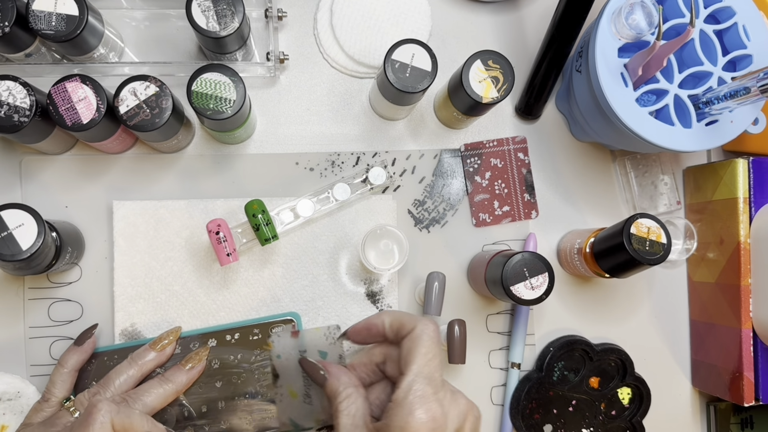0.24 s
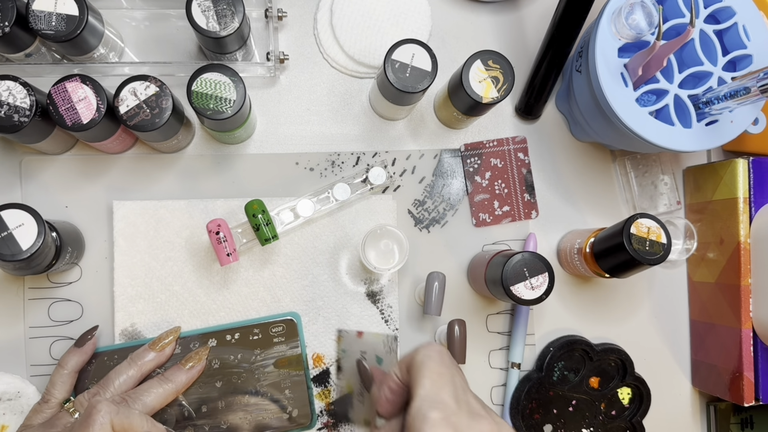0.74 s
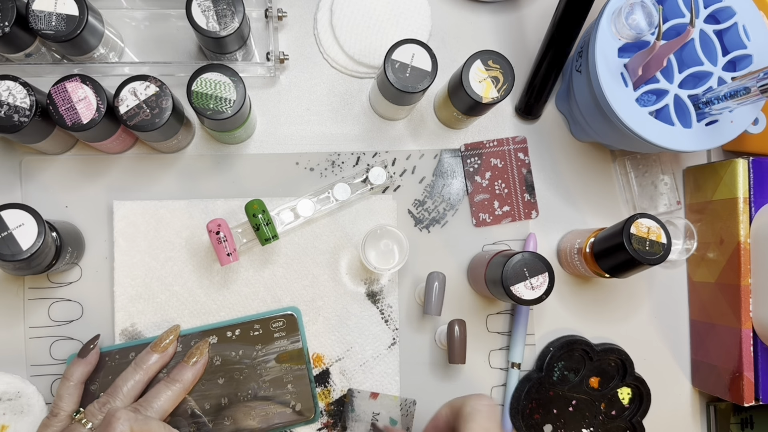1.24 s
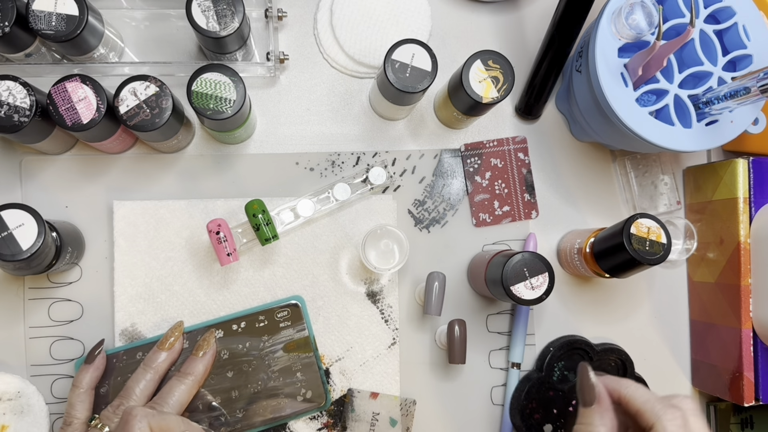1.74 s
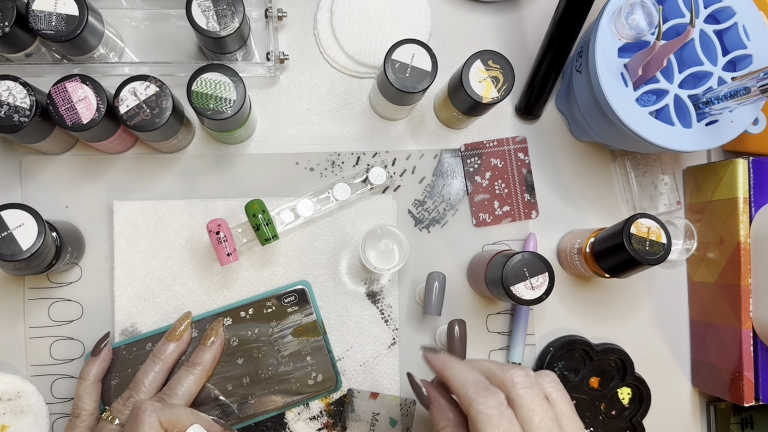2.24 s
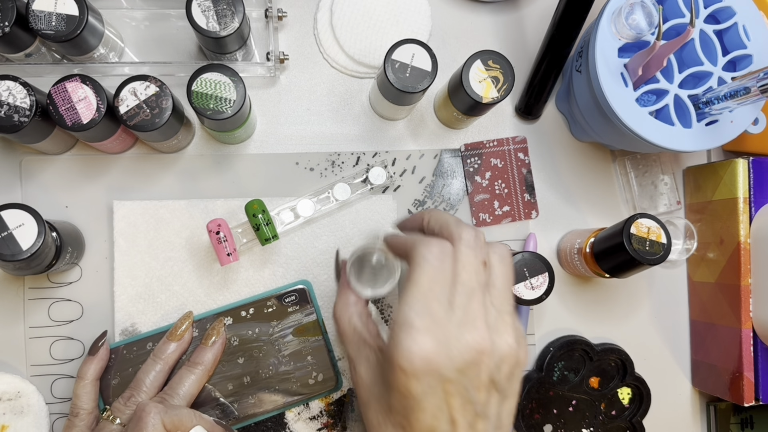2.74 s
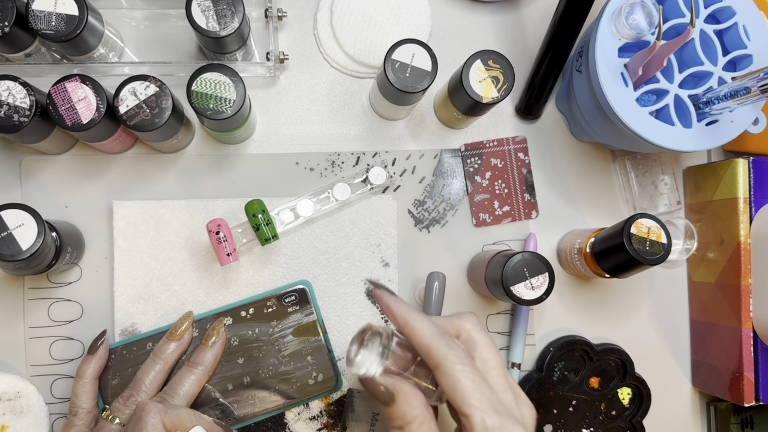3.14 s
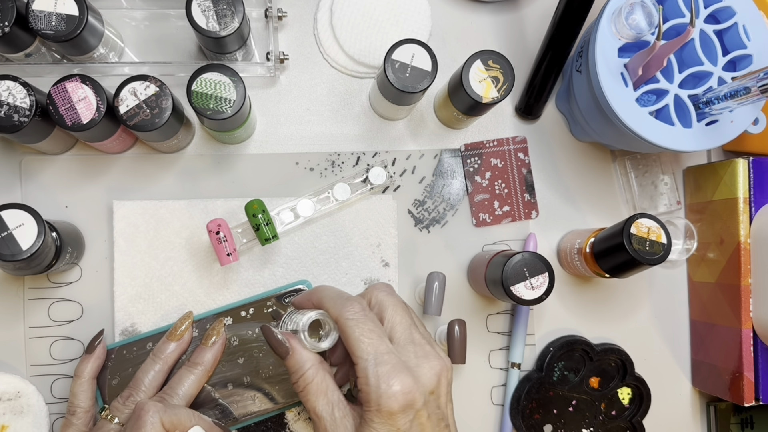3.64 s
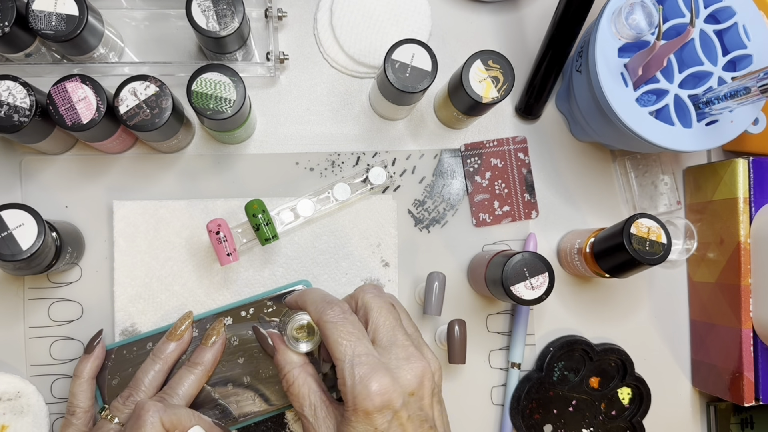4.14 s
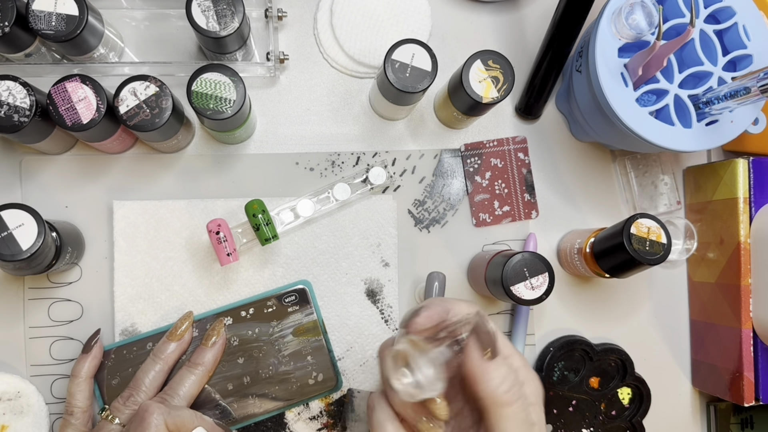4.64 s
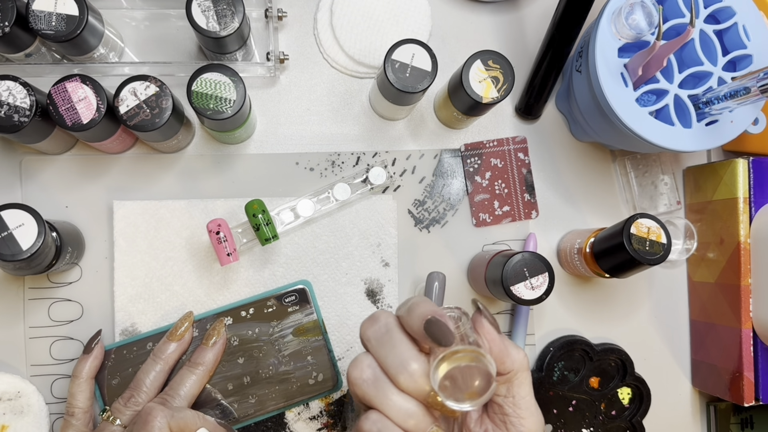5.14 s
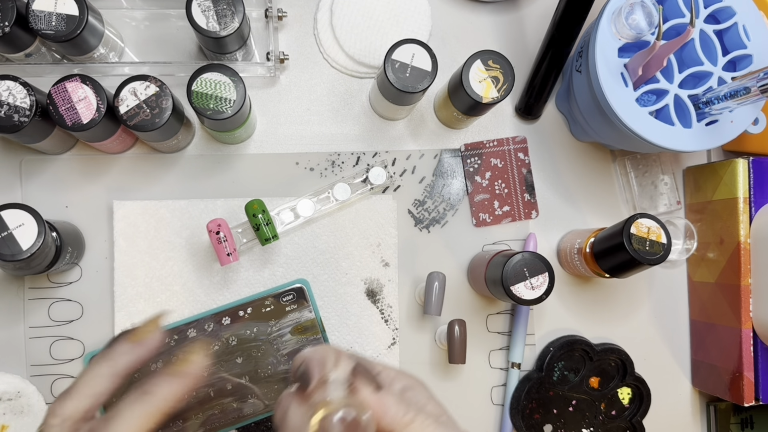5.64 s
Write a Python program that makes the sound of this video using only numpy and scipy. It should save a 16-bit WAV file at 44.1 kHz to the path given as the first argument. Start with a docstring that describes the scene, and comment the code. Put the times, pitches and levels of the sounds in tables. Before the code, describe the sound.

At a desk in a small quiet room with a low hum, a stiff plastic card lands on a steel plate with quick bounces, scrapes, stutters and snaps off the edge. Fingers rub plastic, the card is dropped with a click and thud, then after soft rubbing a stamper bounces on the plate and rolls with gripping creaks. Close stereo microphone, slightly left.

```python
"""A low hum and soft air in a small room, and fingers rubbing plastic; then a card lands on a steel plate.
Nail stamping at a desk, close and slightly left of a two-port microphone. The card scrapes, stutters, snaps
off the plate's edge, rattles and is dropped on the desk; a stamper bounces on the plate and is rolled over it.
Blows ring banks of resonances, friction is random grains through resonances or spectra, and the room is
shaped noise and sines, with a scattered echo and a diffuse tail around the near sounds."""
import sys
import numpy as np
from scipy import signal
from scipy.fft import rfft, irfft, next_fast_len
from scipy.io import wavfile

SR = 44100
rng = np.random.default_rng(int(sys.argv[2]) if len(sys.argv) > 2 else 0)


def to_wav(sig):
    """Store sig (one row per channel, or 1-D mono) as 16-bit WAV at the path in sys.argv[1].

    Samples outside -1..1 are clipped; the rate is SR.
    """
    pcm = np.clip(np.atleast_2d(sig), -1, 1) * 32767
    pcm = np.round(pcm).astype(np.int16)
    wavfile.write(sys.argv[1], SR, pcm.T)  # frames by channels


N = 260234
TIME = np.arange(N) / SR


def from_db(db):
    """Decibels to gain."""
    return 10 ** (np.asarray(db) / 20)


def rms_one(x):
    """Scale to unit rms."""
    return x / np.sqrt(np.mean(x ** 2) + 1e-20)


def at_hz(points, hz):
    """Read a table on a log-frequency axis."""
    knots, values = np.transpose(points)
    return np.interp(np.log(np.maximum(hz, 1)), np.log(knots), values)


def coloured(x, spectrum):
    """Give a signal a spectrum; rms 1."""
    size = next_fast_len(N)
    hz = np.fft.rfftfreq(size, 1 / SR)
    shaped = rfft(x, size) * from_db(at_hz(spectrum, hz))
    return rms_one(irfft(shaped, size)[..., :N])


def filtered(x, order, hz, kind):
    """Butterworth filter."""
    return signal.sosfilt(signal.butter(order, hz, kind, fs=SR, output="sos"), x)


def stereo_noise(side_db):
    """White noise shared by both sides, plus a part of opposite sign in each."""
    mid, side = rng.standard_normal((2, N))
    return mid + from_db(side_db) * side * [[1], [-1]]


def grains(per_s, spread_db):
    """Tiny random catches of one surface on another; rms 1."""
    loudness_db = spread_db * np.minimum(rng.exponential(1, N), 4)
    sizes = from_db(loudness_db) * rng.choice([-1, 1], N)
    caught = rng.random(N) < per_s / SR
    return rms_one(sizes * caught)


def clicks(times, db):
    """One impulse for each contact."""
    out = np.zeros(N)
    out[np.round(times * SR).astype(int)] = from_db(db)
    return out


def resonate(x, hz, width):
    """A resonance with gain 1 on top."""
    r = np.exp(-np.pi * width / SR)
    zeros = np.array([1, 0, -1]) * (1 - r * r) / 2
    poles = [1, -2 * r * np.cos(2 * np.pi * hz / SR), r * r]
    return signal.lfilter(zeros, poles, x + 1e-18)


def mode(x, hz, width):
    """A body's mode radiates only near its own pitch, so its skirts are steep."""
    return resonate(resonate(x, hz, width), hz, 0.46 * hz)


def struck(modes, times, db, low_db, high_db, spread_s):
    """Blows ring a body; bending waves carry the high modes out first and the low ones a little later."""
    out = np.zeros(N)
    height = sum(from_db(level) * 2 * np.pi * width / SR for hz, width, level in modes)
    for hz, width, level in modes:
        low_part = low_db * np.interp(hz, (1300, 2000), [1, 0])
        high_part = high_db * np.interp(hz, (3000, 5500), [0, 1])
        travel = spread_s * np.sqrt(modes[0][0] / hz)
        blows = clicks(times + travel, db + level + low_part + high_part)
        out += mode(blows, hz, width)
    return 2 * out / height


def crack(times, db, hz, width):
    """The contact itself: a sharp snap of one or two cycles."""
    snap = filtered(resonate(clicks(times, db), hz, width), 2, 1500, "high")
    return snap * SR / (np.pi * width)


def gate(start, end, attack_s, release_s):
    """One while two surfaces touch, with short ramps."""
    return np.clip((TIME - start) / attack_s, 0, 1) * np.clip((end - TIME) / release_s, 0, 1)


# a stroke's rise from its ends to its peak [dB]; its fade in and out [s]
SWELL_DB, SWELL_EDGE_S = 10, .012


def swells(strokes):
    """Gain of hand strokes that speed up to a peak and slow down again."""
    total = 0
    for start, peak, end, db in strokes:
        from_peak = np.interp(TIME, [start, peak, end], [1, 0, 1])
        gain = from_db(db - SWELL_DB * from_peak ** 1.4)
        total = total + gain * gate(start, end, SWELL_EDGE_S, SWELL_EDGE_S)
    return total


def waver(per_s, depth_db):
    """A gain that wanders at random."""
    return from_db(depth_db * np.interp(TIME * per_s, np.arange(2000), rng.standard_normal(2000)))


# a dropped thing bounces ever faster: the k-th gap is the first gap / k ** BOUNCE_HASTE
BOUNCE_HASTE, BOUNCE_SCATTER_DB = .57, 1.23
BOUNCE_DULLING_DB = 0.73  # high modes lost on each bounce


def bounces(start, db, first_gap_s, loss_db, low_db, high_db, count=10):
    """Contacts of one landing, sooner, fainter and duller: times, strength, low and high modes."""
    k = np.arange(count)
    times = start + first_gap_s * np.append(0, np.cumsum(k[1:] ** -BOUNCE_HASTE))
    scatter_db = BOUNCE_SCATTER_DB * rng.standard_normal((2, count)) * (k > 0)
    strength_db = db - loss_db * k + scatter_db[0]
    return times, strength_db, low_db + scatter_db[1], high_db - BOUNCE_DULLING_DB * k


# low rumble of the room: (frequency [Hz], relative density [dB])
RUMBLE_SPECTRUM = [(20, -31), (30, -15), (38, -4.5), (55, -0.5), (70, -1), (85, -3), (125, -4), (170, -12),
                   (230, -18.5), (320, -23), (400, -28), (700, -63)]
# air of the room: (frequency [Hz], relative density [dB])
AIR_SPECTRUM = [(180, -30.5), (300, -6), (332, -3), (379, -17), (452, -3), (494, -6.5), (653, -6.5),
                (790, -13), (863, -8.5), (1040, -16.5), (1880, -15.5), (3800, -31), (4800, -41),
                (7350, -32.5), (10000, -40), (13000, -69), (22000, -120)]
# steady hum lines: (frequency [Hz], rms level [dB])
HUM_LINES = [(57.2, -59), (120, -69.5), (238.5, -72), (266, -78.5)]


def background():
    """Rumble, air, a faint hiss and the lines of a low hum."""
    rumble = from_db(-55.5) * coloured(stereo_noise(side_db=-39), RUMBLE_SPECTRUM)
    air = from_db(-65.5) * coloured(stereo_noise(side_db=-11.5), AIR_SPECTRUM)
    diffuse_spectrum = [(30, -24.5), (70, -8.5), (150, -6.5), (500, -5), (900, -3.5),
                        (1600, -21.5), (5000, -42.5)]
    diffuse = from_db(-68) * coloured(rng.standard_normal(N), diffuse_spectrum)
    hiss_spectrum = [(5000, -9), (10000, -4), (15000, 3.5), (18000, -5.5)]
    hiss = from_db(-83) * coloured(rng.standard_normal(N), hiss_spectrum)
    hum = 0
    for hz, db in HUM_LINES:
        hum = hum + from_db(db) * np.sqrt(2) * np.sin(2 * np.pi * (hz * TIME + rng.random()))
    return rumble + air + hiss + hum + diffuse * [[1], [-1]]  # the diffuse part is opposite in the two sides


# level of the room's tail: (frequency [Hz], gain [dB])
TAIL_GAIN = [(150, 5.5), (500, 0), (1200, -10.5), (2700, -13.5), (5000, -11), (9000, -16)]
# how long the room rings: (frequency [Hz], time to fall 60 dB [s])
TAIL_T60 = [(150, .36), (600, .26), (2500, 0.39), (6000, 0.31), (10000, 0.34)]


def room(x, side_db):
    """A diffuse tail that builds up quickly and dies band by band."""
    t, tail = TIME[:SR // 2], 0
    edges = np.geomspace(70, 17000, 12)
    for low, high in zip(edges, edges[1:]):
        hz = np.sqrt(low * high)
        fade = from_db(-60 * t / at_hz(TAIL_T60, hz)) * np.clip((t - .003) / 0.0027, 0, 1)
        # long waves reach both sides alike
        width_db = side_db + at_hz([(100, -22.5), (500, 0), (2500, 0), (9000, -9)], hz)
        noise = filtered(rms_one(stereo_noise(width_db)[:, :len(t)]), 2, [low, high], "band")
        tail = tail + from_db(at_hz(TAIL_GAIN, hz)) * noise * fade / np.sqrt(np.sum(fade ** 2))
    return signal.fftconvolve(x[None], tail, axes=1)[:, :N]


def desk_echoes(x, echo_db, fade_s):
    """Bottles and desk top scatter the sound within milliseconds, differently to each side."""
    t = TIME[:SR // 25]
    scatter = rng.standard_normal((2, len(t))) * np.exp(-t / fade_s) * (t > .0012)
    scatter = scatter + .3 * scatter[::-1]  # each side hears some of the other
    scatter /= np.sqrt(np.sum(scatter ** 2, axis=1, keepdims=True))
    return from_db(echo_db) * signal.fftconvolve(x[None], scatter, axes=1)[:, :N]


# skin rubbing on plastic: (start [s], peak [s], end [s], level before a shared 1.5 dB lift [dB])
RUB_STROKES = [(-.06, .06, 0.19, -63), (.95, 1.05, 1.22, -55.5), (1.46, 1.55, 1.74, -60.5),
               (1.785, 1.83, 2.07, -57.5), (2.39, 2.45, 2.56, -75.5), (2.68, 2.75, 2.82, -67),
               (2.97, 3.03, 3.23, -71), (4.32, 4.365, 4.44, -66.5), (5.44, 5.458, 5.47, -64),
               (5.54, 5.62, 5.7, -70)]
# hiss of skin: (frequency [Hz], relative density [dB])
SKIN_SPECTRUM = [(900, -12.5), (1800, -3.5), (3000, -.5), (4000, -6.5), (4900, -13), (5700, 1), (7500, 0.5),
                 (9500, -0.5), (16000, -1)]


def finger_rubs():
    """Fingertips slide over card and tools with a smooth, high hiss."""
    hiss = coloured(grains(per_s=9000, spread_db=3.0), SKIN_SPECTRUM)
    return from_db(1.5) * swells(RUB_STROKES) * hiss


# light ticks of fingernails, plastic and one duller tap on the plate:
# (time [s], strength before a shared 6 dB lift [dB], high modes [dB])
TICKS = [(0.234, -37, 7.5), (0.4727, -24, -4.5), (1.1058, -32, -4), (1.1153, -20, 0.5), (1.1243, -21, -1.5),
         (1.1574, -27, -15), (1.168, -33, -4), (1.1930, -36, 8), (1.9350, -43.5, 8), (2.7090, -28.5, -3),
         (4.364, -45, 1), (4.4015, -36, -8)]
# modes that the light ticks ring: (frequency [Hz], width [Hz], relative level [dB])
TICK_MODES = [(1380, 450, -8), (2000, 410, -6.5), (2500, 250, -4), (3400, 150, -10), (6000, 590, -27),
              (7470, 700, -3.5), (9100, 900, -6), (10150, 1200, -5), (14480, 2300, -10)]


def light_ticks():
    """Small contacts, some bright and some duller, ring one shared set of modes."""
    times, db, high_db = np.transpose(TICKS)
    return struck(TICK_MODES, times, db + 6, 0, high_db, spread_s=.0002)


# the card slides on the paper mat: (start [s], peak [s], end [s], level [dB])
MAT_STROKES = [(.96, 1.09, 1.21, -59)]
# modes of the plastic card: (frequency [Hz], width [Hz], relative level [dB])
CARD_MODES = [(557, 62, -10), (746.7, 260, -1), (1096, 160, 2), (1260, 130, -11), (1900, 180, -8.5),
              (2390, 340, -6.5), (2687, 280, 1.5), (2906, 220, 3.5), (3240, 300, -1), (3980, 450, -7),
              (5640, 550, -7.5), (6280, 900, -7.5), (7050, 500, -12), (8000, 850, -8.5), (9203, 280, -5.5)]


def card_rustle():
    """The card slides over the paper mat before it is let go, faintly ringing its own modes."""
    friction = grains(per_s=2700, spread_db=2.5)
    ring = sum(from_db(db) * resonate(friction, hz, width) for hz, width, db in CARD_MODES)
    return swells(MAT_STROKES) * rms_one(filtered(ring, 2, 2400, "high"))


# the card snaps off the plate and knocks on the desk:
# (time [s], strength [dB], low modes [dB], high modes [dB], desk thud [dB], crack [dB])
KNOCKS = [(0.715, 0, -24, 1.5, -75, -7), (0.7243, .5, 4, 1.5, -43, -6), (1.212, -9, -14, 7, -62, -24.5),
          (1.2148, 0.5, -3, 0, -23, -2)]
# modes of the desk: (frequency [Hz], width [Hz], relative level [dB])
DESK_MODES = [(97.7, 16, -1.5), (127.1, 24, 3), (193, 26, 0), (220, 30, -1.5), (305, 40, -1.5),
              (491.4, 55, -1), (538, 55, -2), (630, 70, 1)]


def card_knocks():
    """The stiff card cracks, and the desk under it thuds."""
    times, db, low_db, high_db, thud_db, crack_db = np.transpose(KNOCKS)
    card = struck(CARD_MODES, times, db, low_db, high_db, spread_s=0.00026)
    snap = crack(times + .0001, crack_db, hz=3217, width=3800)
    thud = struck(DESK_MODES, times, thud_db, 0, 0, spread_s=0.0036)
    return card + snap + thud


# modes of the steel plate: (frequency [Hz], width [Hz], relative level [dB])
PLATE_MODES = [(201, 40, -14), (310, 60, -8), (486.4, 100, -7), (710, 90, -13), (856, 230, -9.5),
               (1183, 170, -4.5), (1404, 74, -6.5), (1720, 170, -7), (1933, 90, 1), (2308, 170, 4.5),
               (2660, 150, -4.5), (2802, 140, 2.5), (3100, 63, -7.5), (3485, 220, -12), (4190, 330, -7),
               (5500, 420, -12.5), (6200, 450, -11.5), (8100, 350, -18), (8590, 350, -19),
               (9266, 660, -19.5)]


def card_taps(times, db, low_db, high_db):
    """Taps of the card ring the plate's modes, each with a short crack."""
    ring = struck(PLATE_MODES, times, db, low_db, high_db, spread_s=.0008)
    return ring + crack(times, db + high_db - 19.5, hz=4000, width=5700)


# the card lands on the plate, and later rattles after it snaps off the edge:
# (time [s], strength [dB], first gap [s], loss per bounce [dB], low modes [dB], high modes [dB])
RATTLES = [(0.1191, -12, .0148, 2.5, 2.5, 3.5), (0.7246, -23.5, .016, 0.66, -8, 6)]


def card_rattles():
    """The card lands on the plate, and later rattles after it snaps off the edge: two runs of bounces."""
    return card_taps(*np.hstack([bounces(*rattle) for rattle in RATTLES]))


# near the edge the card sticks and slips, harder each time apart from a random scatter
STUTTER_START_S, SLIP_GAP_S, SLIP_JITTER_S = .6262, .0097, .0008
SLIP_DB, SLIP_GROWTH_DB, SLIP_SCATTER_DB = -29, 1.0, 1.25


def card_stutter(count=9):
    """The card sticks and slips, growing harder, until it leaves the plate."""
    k = np.arange(count)
    early, stronger = rng.standard_normal((2, count))
    times = STUTTER_START_S + SLIP_GAP_S * k + SLIP_JITTER_S * early
    strength_db = SLIP_DB + SLIP_GROWTH_DB * k + SLIP_SCATTER_DB * stronger
    return card_taps(times, strength_db, low_db=0, high_db=3)


def sliding(gain, per_s, spread_db, soft_hz, rasp_db):
    """Friction grains ring the plate and rasp at the contact; a softer contact leaves out the top."""
    force = filtered(grains(per_s, spread_db), 4, min(soft_hz, 15000), "low")
    ring = sum(from_db(db) * resonate(force, hz, width) for hz, width, db in PLATE_MODES)
    rasp = from_db(rasp_db) * resonate(force, hz=1200, width=2800)
    return gain * rms_one(ring + rasp)


# the card's edge is drawn over the plate:
# (start [s], end [s], level at start [dB], swell [dB per s], hiss relative to the level [dB])
EDGE_SCRAPES = [(.15, .51, -50, -5, -17), (.563, .715, -52.5, 48, -7.5)]
# hiss of scraped steel: (frequency [Hz], relative density [dB])
SCRAPE_SPECTRUM = [(3000, -31.5), (4800, -4.5), (5700, 0.5), (6500, -1), (7300, -1), (8500, -0.5),
                   (10000, -8.5), (16000, -7.5)]
SCRAPE_ATTACK_S, SCRAPE_RELEASE_S = 0.023, .045


def card_scrape():
    """The card's edge drags over the etched steel with a fine hiss."""
    drag, fine = 0, 0
    for start, end, db, swell_db_per_s, hiss_db in EDGE_SCRAPES:
        level = from_db(db + swell_db_per_s * (np.clip(TIME, start, end) - start))
        touch = gate(start, end + SCRAPE_RELEASE_S / 2, SCRAPE_ATTACK_S, SCRAPE_RELEASE_S)
        drag = drag + level * touch
        fine = fine + level * touch * from_db(hiss_db)
    body = sliding(drag, per_s=2200, spread_db=2.5, soft_hz=3330, rasp_db=-15)
    hiss = fine * coloured(grains(per_s=9000, spread_db=2.5), SCRAPE_SPECTRUM)
    return waver(per_s=45, depth_db=1.8) * (body + hiss)


# the rolling silicone grips and lets go at a nearly even pace, counted from GRIP_AT_S both ways
GRIP_AT_S, GRIP_GAP_S, GRIP_JITTER_S, GRIP_RISE_S, GRIP_SCATTER_DB = 3.456, .027, 0.0034, 0.0031, 1.8


def grips(count=32):
    """Gain of the short swells in which the silicone lets go of the steel: a quick rise, a slower fall."""
    early, stronger = rng.standard_normal((2, count))
    steps = np.arange(count) - count // 4
    times = GRIP_AT_S + GRIP_GAP_S * steps + GRIP_JITTER_S * early
    age = TIME[:SR // 20] / GRIP_RISE_S
    swell = age ** 2 * np.exp(-age)
    return signal.fftconvolve(clicks(times, GRIP_SCATTER_DB * stronger), swell / swell.max())[:N]


# how hard the stamper is rolled over the plate: (time [s], level [dB])
ROLL_LEVEL = [(3.37, -57), (3.397, -48.5), (3.46, -45), (3.58, -44.5), (3.71, -46), (3.8, -57.5),
              (3.95, -69), (4.08, -80)]
# the stamper creaks as it is tipped and lifted:
# (start [s], peak [s], end [s], level before a shared 3.5 dB cut [dB])
CREAK_STROKES = [(4.42, 4.46, 4.505, -55.5), (4.532, 4.543, 4.556, -51.5)]
HISS_FADE_DB_PER_S = 23  # the roll loses its hiss as it goes on


def stamper_roll():
    """Soft silicone rolls over the plate: pressed hard it grips in bright swells, then turns smooth and dull."""
    times, db = np.transpose(ROLL_LEVEL)
    touch = gate(times[0], times[-1], SWELL_EDGE_S, SWELL_EDGE_S)
    rolling = from_db(np.interp(TIME, times, db)) * touch
    effort = rolling / rolling.max()
    grip_share = 0.65 * effort ** 0.48
    slipping = rolling * (grip_share * grips() + (1 - grip_share) * from_db(-6.0))

    # the dull part levels off however hard the roll is pressed
    dull_gain = from_db(-1) * rolling / (1 + rolling / from_db(-58))
    dull = sliding(dull_gain, per_s=1200, spread_db=3.0, soft_hz=1700, rasp_db=-13)

    creak_gain = from_db(.5) * slipping * effort ** .15 + from_db(-3.5) * swells(CREAK_STROKES)
    creak = sliding(creak_gain, per_s=2500, spread_db=2.0, soft_hz=3410, rasp_db=-23)

    fade = from_db(-HISS_FADE_DB_PER_S * np.maximum(TIME - GRIP_AT_S, 0))
    hiss_gain = from_db(-9.5) * slipping * effort ** 0.9 * fade
    hiss = hiss_gain * coloured(grains(per_s=5000, spread_db=3.0), SCRAPE_SPECTRUM)
    return dull + creak + hiss


# the stamper lands on the plate:
# (time [s], strength [dB], first gap [s], loss per bounce [dB], low modes [dB], high modes [dB])
STAMPER_DROP = (3.1744, -14, .018, 1.52, 3.5, -2.5)


def stamper():
    """The stamper bounces, then rolls; its hollow barrel adds a ring and deadens the plate's middle."""
    landing = struck(PLATE_MODES, *bounces(*STAMPER_DROP), spread_s=0.00061)
    contact = landing + stamper_roll()
    barrel = from_db(-7.5) * resonate(contact, hz=2922, width=240)
    deadened = from_db(-20) * resonate(contact, hz=2060, width=580)
    return from_db(0.5) * (contact + barrel - deadened)


def scene():
    """Everything on the desk, a little to the left, with its echoes, over the background."""
    card = card_rattles() + card_stutter() + card_knocks() + card_scrape() + card_rustle()
    near = finger_rubs() + light_ticks() + card + stamper()
    direct = near * from_db(0.91 * np.array([[.5], [-.5]]))  # left is 0.91 dB louder
    echoes = desk_echoes(near, echo_db=-8, fade_s=0.012)
    return background() + room(near, side_db=-3.5) + echoes + direct


# the two ports fall out of step in the treble: (frequency [Hz], phase by which left leads [radians])
PORT_LEAD = [(250, 0), (800, .4), (1500, 0), (4000, -.35), (4900, -.8), (5500, -.2), (7000, -.45),
             (9700, -1.8), (11000, -3.0), (14000, -3.15), (15500, -3.9)]
# the microphone's colour: (frequency [Hz], gain [dB])
MIC_GAIN = [(6000, 0), (7200, 0), (9200, 0), (10200, -2), (11200, -10), (13000, -11), (15300, -4),
            (16200, -16)]


def ports(x):
    """Each frequency reaches the two ports with its own phase, and both share one colour."""
    size, sides = next_fast_len(N + SR // 10), np.array([[.5], [-.5]])
    hz = np.fft.rfftfreq(size, 1 / SR)
    response = from_db(at_hz(MIC_GAIN, hz)) * np.exp(1j * sides * at_hz(PORT_LEAD, hz))
    return irfft(rfft(x, size) * response, size)[:, :N]


def record(dry):
    """A two-port microphone, with the top cut off steeply above 16.4 kHz."""
    top_cut = signal.ellip(8, .2, 70, 16400, fs=SR, output="sos")
    return signal.sosfilt(top_cut, ports(dry))


dry = scene()
out = record(dry)
to_wav(out)
```